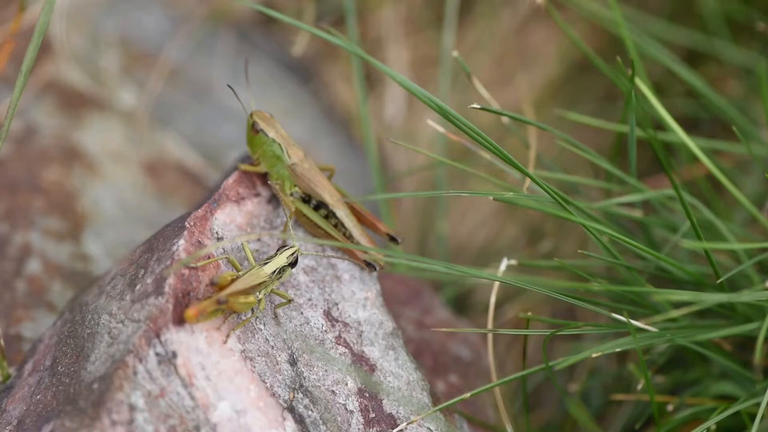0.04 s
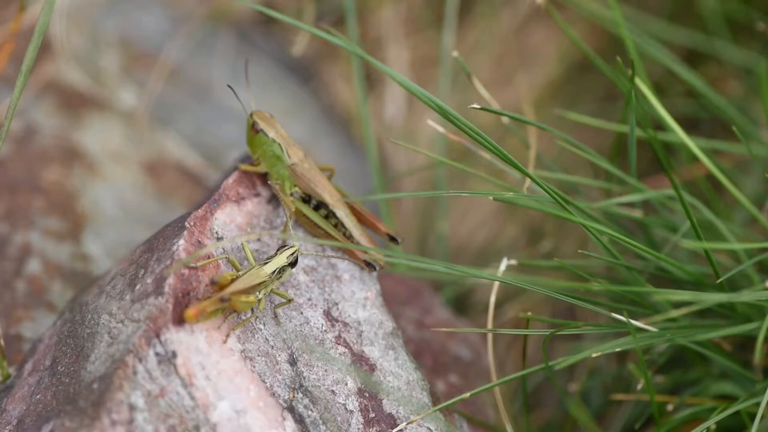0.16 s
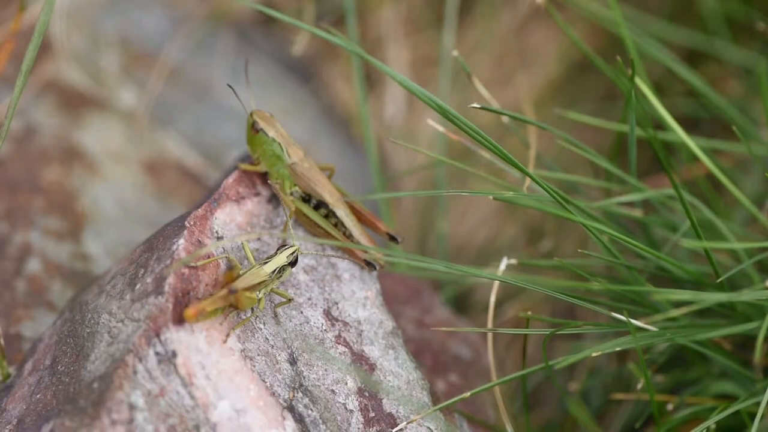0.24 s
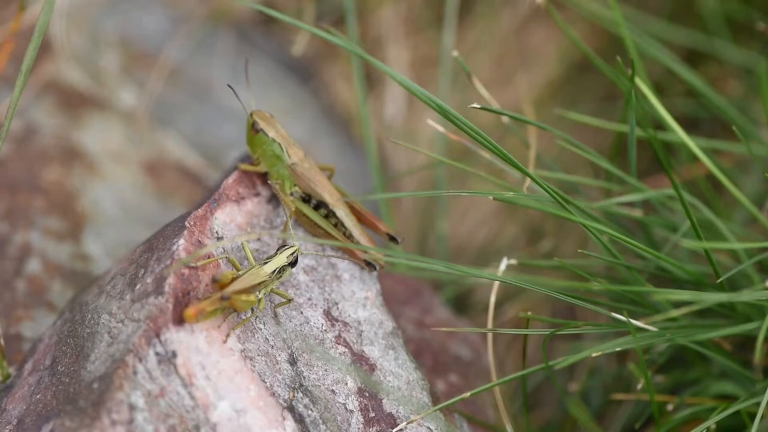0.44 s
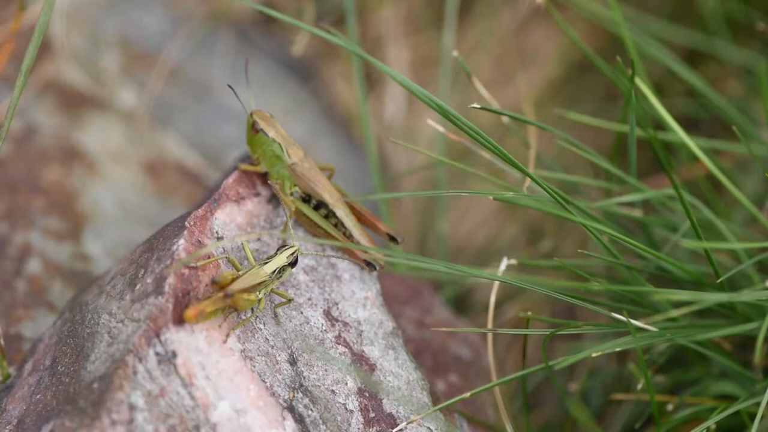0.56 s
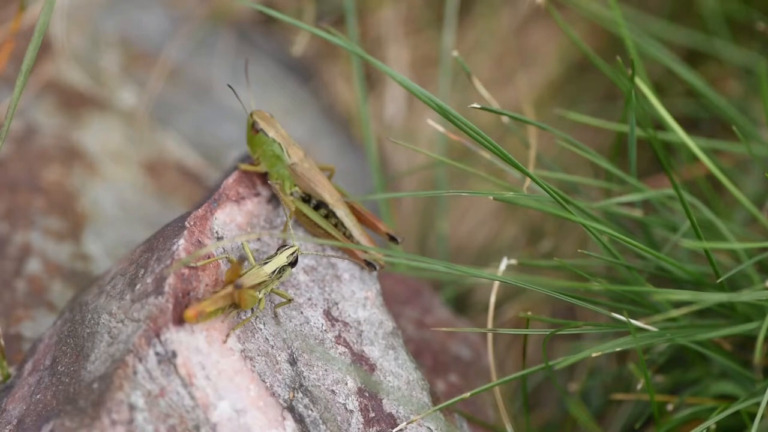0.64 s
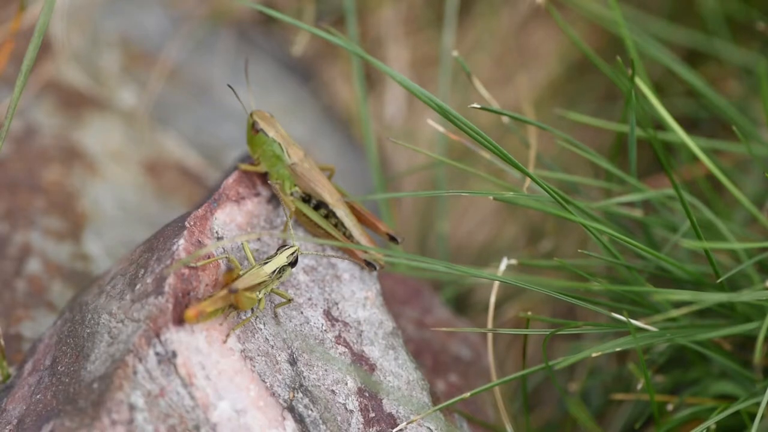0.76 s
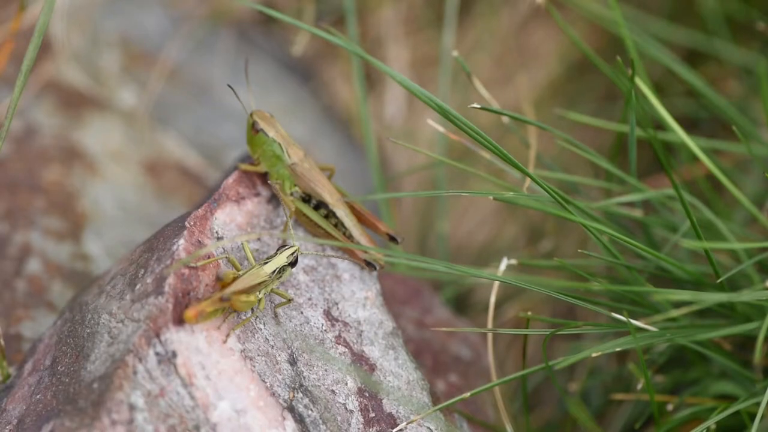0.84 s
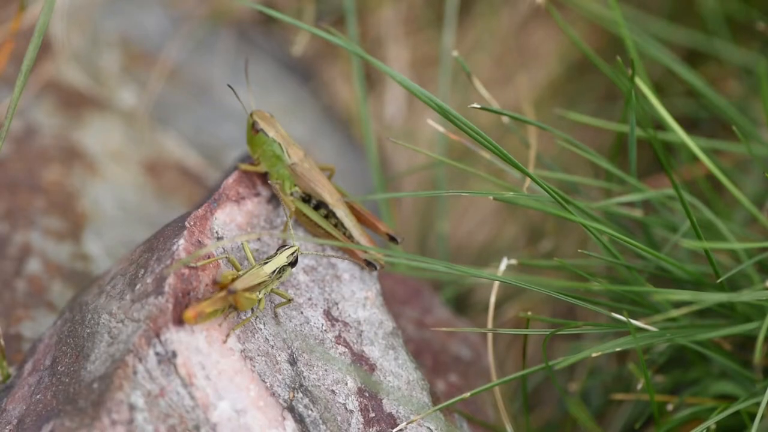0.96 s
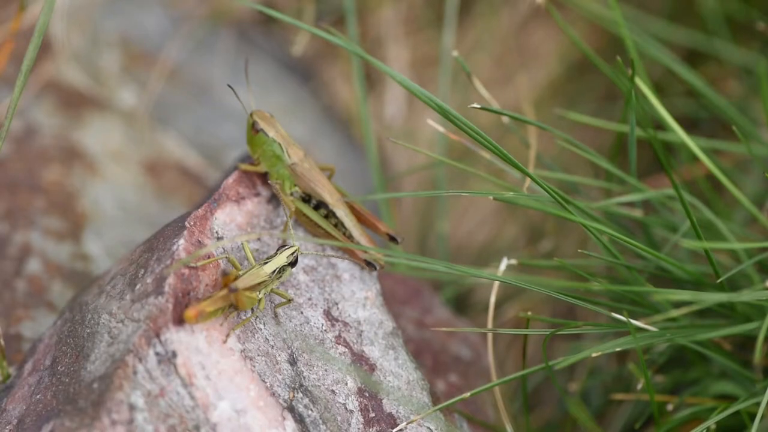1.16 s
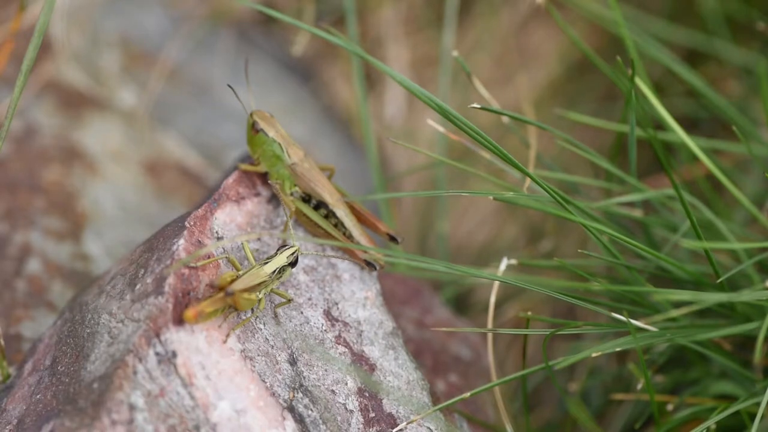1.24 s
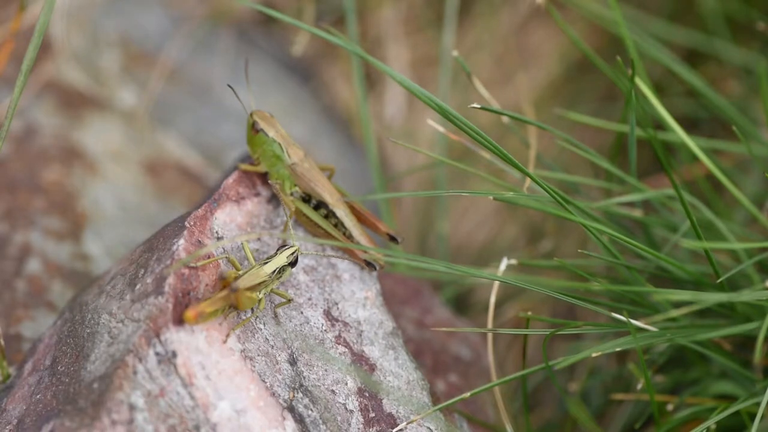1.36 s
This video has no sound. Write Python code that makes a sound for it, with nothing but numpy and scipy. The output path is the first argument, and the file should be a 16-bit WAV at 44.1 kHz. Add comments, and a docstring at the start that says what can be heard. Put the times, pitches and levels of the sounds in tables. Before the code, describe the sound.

A grasshopper rasps softly on the left in a meadow, its quick, high, scratchy strokes growing louder. A low microphone thump comes first, then a few faint knocks, with steady hiss and low rumble underneath.

```python
"""A thump comes first, as the recorder switches on and its offset voltage drains away. Then a grasshopper
rasps softly on the left in a meadow: pegs on its leg strike a wing vein, and each impact rings the wing.
Each stroke is a slow scrape that swells, then a few quick jerks, and the strokes grow louder. Faint low
knocks sound early on; microphone hiss and a low rumble, stronger on the left, lie underneath."""
import sys
import numpy as np
from scipy import signal
from scipy.io import wavfile
from scipy.ndimage import uniform_filter1d

SR = 44100
rng = np.random.default_rng(int(sys.argv[2]) if len(sys.argv) > 2 else 0)


def master_out(mix):
    """Clip the mix to full scale and print it as 16-bit PCM to the path in sys.argv[1]."""
    frames = np.transpose(np.atleast_2d(mix))
    ceiling = np.clip(frames, -1, 1)
    pcm = np.round(ceiling * 32767).astype(np.int16)
    wavfile.write(sys.argv[1], SR, pcm)


N = 61739

# slow scrapes of the leg (start [s], length [s], final level [dB])
LEG_SCRAPES = [(.19, 0.053, -60), (0.313, 0.074, -56.5), (0.45, 0.056, -58), (0.579, .073, -53.5),
               (0.698, 0.072, -54.5), (0.833, .074, -51.5), (.96, .074, -50), (1.088, 0.088, -49.5),
               (1.228, .077, -49), (1.375, 0.063, -49)]
# quick jerks of the leg (start [s], length [s], level [dB])
LEG_JERKS = [(.2514, .004, -57), (.3881, .0025, -48), (.3912, .0025, -51.5), (.5104, .0032, -48),
             (.5274, .0034, -51.5), (.6535, .003, -46.5), (.6681, .004, -54.5), (.7646, .002, -52),
             (.7677, .002, -52), (.7779, .003, -47.5), (.7917, .003, -44), (.906, .002, -47),
             (.9099, .002, -48), (.9163, .0028, -49), (.919, .0024, -43), (.9323, .0055, -49.5),
             (1.0401, .0032, -44.5), (1.0527, .0035, -41.5), (1.0668, .0052, -48.5), (1.172, .0022, -46),
             (1.1755, .0024, -45), (1.1876, .0024, -40), (1.1915, .0006, -44), (1.2042, .0045, -42.5),
             (1.3045, .0038, -47), (1.3094, .002, -49), (1.3176, .0032, -41), (1.3218, .0006, -48.5),
             (1.3323, .0048, -42), (1.3493, .0048, -50)]
# wing resonances (frequency [Hz], bandwidth [Hz], relative level in a scrape [dB], in a jerk [dB])
WING_MODES = [(5540, 1300, 0.5, -5.5), (8510, 960, -0.5, -0.5), (10930, 1200, 0.5, -0.5),
              (12230, 1120, -4.5, -2), (14500, 1900, -5.5, -7)]
# high-pass stages, left then right (step [full scale], cutoff 1 [Hz], Q 1 [-], cutoff 2 [Hz], Q 2 [-])
THUMP_STAGES = [(.060, 33.4, 1.21, 8.9, 1.06), (.060, 32.2, 1.2, 6, 2.0)]
# wobbles after switch-on (start [s], frequency [Hz], level [dB], 60 dB decay time [s], rise time [s])
WOBBLE_MODES = [(.1264, 92, -35, .05, .002), (.1386, 44.6, -36.3, .17, .015)]
# low knocks (time [s], level [dB], upper mode relative to lower [dB])
LOW_KNOCKS = [(.166, -57, 0), (.186, -56, 3), (.289, -49.5, -20), (.3062, -51, 10), (.3359, -57, 0),
              (.3651, -52, -20)]
# the two modes of a knock (frequency [Hz], 60 dB decay time [s])
KNOCK_RESONANCES = [(163.6, .4), (257, .12)]
# hiss spectrum (frequency [Hz], relative density [dB])
HISS_SPECTRUM = [(180, -43), (300, -4.5), (1640, -6), (2440, -7.5), (3890, -7), (4520, -7.5), (6410, -8),
                 (14200, -8.5), (16000, -12.5)]
# likeness of left and right hiss (frequency [Hz], correlation [-])
HISS_CORRELATION = [(60, .4), (300, 0.19), (1500, 0.42), (4000, 0.36), (8000, .25), (15000, 0.5)]
# rumble spectrum ahead of its treble roll-off (frequency [Hz], relative density [dB])
RUMBLE_SPECTRUM = [(15, -42), (25, -1.5), (146, 0.5), (195, -1.5), (248, -9), (275, -2), (575, -8.5),
                   (1290, -3), (1500, 0), (1950, -40), (3300, -120)]

SCRAPE_PEGS_PER_S, JERK_PEGS_PER_S = 1600, 3400
PEG_JITTER, PEG_SPREAD_DB = .3, 2.5  # scatter of log spacing and of strength
SWELL_DB, EDGE_S, CLUMP_DB, CLUMP_S = 15, .0007, 2.5, .0027  # envelope of a scrape
HISS_DB, RUMBLE_DB = (-56, -57), (-58.5, -67)  # left, right
SWITCH_ON_S, MIC_TOP_HZ, BAND_LIMIT_HZ = .12607, 15850, 16850


def grasshopper():
    """Stridulation: the sound is the train of peg impacts convolved with the wing's impulse response."""
    _, _, scrape_db, jerk_db = np.transpose(WING_MODES)
    rasp = signal.oaconvolve(scrapes(), wing(scrape_db))
    ticks = signal.oaconvolve(jerks(), wing(jerk_db))
    return (rasp + ticks)[:N]


def scrapes():
    """Amplitude modulation: a slow run of peg impacts swells along each scrape, in random clumps."""
    swell = np.zeros(N)
    for start, length, db in LEG_SCRAPES:
        t = np.arange(N) / SR - start
        gate = np.clip(np.minimum(t, length - t) / EDGE_S + .5, 0, 1)
        swell += gate * gain_of(db - SWELL_DB * (1 - np.clip(t / length, 0, 1)))
    clumps = unit_rms(uniform_filter1d(rng.standard_normal(N), round(CLUMP_S * SR)))
    return swell * unit_rms(gain_of(CLUMP_DB * clumps)) * peg_train()


def peg_train():
    """Quasi-periodic excitation: pegs strike the vein at uneven intervals and with unequal force."""
    gaps = SR / SCRAPE_PEGS_PER_S * np.exp(PEG_JITTER * rng.standard_normal(12000))
    strength = gain_of(PEG_SPREAD_DB * rng.standard_normal(12000))
    at = np.cumsum(gaps)
    impacts = np.zeros(N)
    impacts[at[at < N].astype(int)] = strength[at < N]
    return unit_rms(impacts)


def jerks():
    """Impulsive excitation: each jerk drags a short, fast run of pegs over the vein, loudest midway."""
    impacts = np.zeros(N)
    for start, length, db in LEG_JERKS:
        gaps = np.exp(PEG_JITTER * rng.standard_normal(40)) / JERK_PEGS_PER_S
        t = np.cumsum(gaps) - .5 / JERK_PEGS_PER_S
        arch = np.sin(np.pi * np.clip(t / length, .1, .9)) ** .4
        strength = (t < length) * arch * gain_of(PEG_SPREAD_DB * rng.standard_normal(40))
        strength *= np.sqrt(length * SR) / (np.linalg.norm(strength) + 1e-9)  # unit rms over the jerk
        np.add.at(impacts, ((start + t) * SR).astype(int), gain_of(db) * strength)
    return impacts


def wing(levels_db):
    """Modal superposition: one impact rings the wing as a sum of damped sinusoids, of unit energy."""
    t = np.arange(200) / SR
    ring = np.zeros_like(t)
    for k, (hz, width, _, _) in enumerate(WING_MODES):
        envelope = gain_of(levels_db[k]) * width * np.exp(-np.pi * width * t)
        ring += (-1) ** k * envelope * np.sin(2 * np.pi * hz * t)
    ring = signal.sosfilt(signal.butter(4, 4700, "high", fs=SR, output="sos"), ring)
    return ring / np.linalg.norm(ring)


def thump(step, hz1, q1, hz2, q2):
    """Step response: the offset at switch-on drains through two resonant high-pass stages."""
    voltage = step * (np.arange(N) >= SWITCH_ON_S * SR)
    for omega, q in ((2 * np.pi * hz1, q1), (2 * np.pi * hz2, q2)):
        stage = signal.bilinear([1, 0, 0], [1, omega / q, omega ** 2], SR)
        voltage = signal.lfilter(*stage, voltage)
    return voltage


def wobble():
    """Transient oscillation: two deep tones die away just after switch-on."""
    return sum(damped_mode(*mode) for mode in WOBBLE_MODES)


def knocks():
    """Free vibration: each soft knock rings two low modes."""
    (low_hz, low_t60), (high_hz, high_t60) = KNOCK_RESONANCES
    bumps = np.zeros(N)
    for start, db, upper_db in LOW_KNOCKS:
        bumps += damped_mode(start, low_hz, db, low_t60)
        bumps += damped_mode(start, high_hz, db + upper_db, high_t60)
    return bumps


def damped_mode(start, hz, db, t60, rise=.004):
    """Exponential damping: a sinusoid rises softly and loses 60 dB every t60 seconds."""
    t = np.maximum(np.arange(N) / SR - start, 0)
    return gain_of(db - 60 * t / t60) * np.sin(2 * np.pi * hz * t) * np.minimum(t / rise, 1)


def microphone_hiss(hz):
    """Self-noise: the microphones add a nearly steady broadband hiss."""
    hiss = stereo_noise(curve_at(HISS_SPECTRUM, hz), curve_at(HISS_CORRELATION, hz), patch_db=.68)
    return gain_of(HISS_DB)[:, None] * hiss


def rumble(hz):
    """Spectral shaping: lumpy noise, rolled off above 1200 Hz, is heard as a low rumble."""
    spectrum_db = curve_at(RUMBLE_SPECTRUM, hz) - 12 * np.log2(1 + (hz / 1200) ** 2)
    return gain_of(RUMBLE_DB)[:, None] * stereo_noise(spectrum_db, correlation=.34, patch_db=2)


def stereo_noise(spectrum_db, correlation, patch_db):
    """Partial coherence: two channels share part of a random spectrum whose level drifts in patches."""
    left_re, left_im, own_re, own_im, patches = rng.standard_normal((N // 256 + 5, 513, 5)).T
    patches = uniform_filter1d(patches, size=6, axis=0)  # across frequency
    patches = unit_rms(uniform_filter1d(patches, size=8, axis=1))  # across time
    left = left_re + 1j * left_im
    right = correlation * left + np.sqrt(1 - correlation ** 2) * (own_re + 1j * own_im)
    spectra = np.array([left, right]) * gain_of(spectrum_db + patch_db * patches)
    _, noise = signal.istft(spectra, nperseg=1024, noverlap=768)
    return unit_rms(noise[:, :N])


def gain_of(db):
    return 10 ** (np.asarray(db) / 20)


def unit_rms(x):
    return x / np.sqrt(np.mean(x ** 2, axis=-1, keepdims=True) + 1e-20)


def curve_at(points, hz):
    frequencies, values = np.transpose(points)
    return np.interp(np.log(hz + 1), np.log(frequencies + 1), values)


def low_pass(x, hz):
    taps = signal.firwin(601, hz, window=("kaiser", 9), fs=SR)
    return signal.oaconvolve(x, taps[None], "same")


def scene():
    """Superposition: the sources add, and level differences between channels place them to the left."""
    hz = np.fft.rfftfreq(1024, 1 / SR)[:, None]
    background = microphone_hiss(hz) + rumble(hz)
    insect = grasshopper() * gain_of([[0], [-37]])  # the right microphone faces away
    bumps = (wobble() + knocks()) * gain_of([[0], [-20]])
    return insect + bumps + background


def record(dry):
    """Gating and band limiting: the microphone band opens at switch-on, and the thump is added to it."""
    live = low_pass(dry, MIC_TOP_HZ) * (np.arange(N) >= SWITCH_ON_S * SR)
    thumps = np.array([thump(*channel) for channel in THUMP_STAGES])
    return low_pass(live + thumps, BAND_LIMIT_HZ)


dry = scene()
out = record(dry)
master_out(out)
```